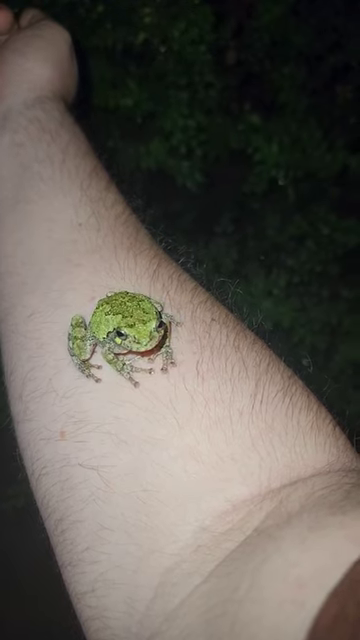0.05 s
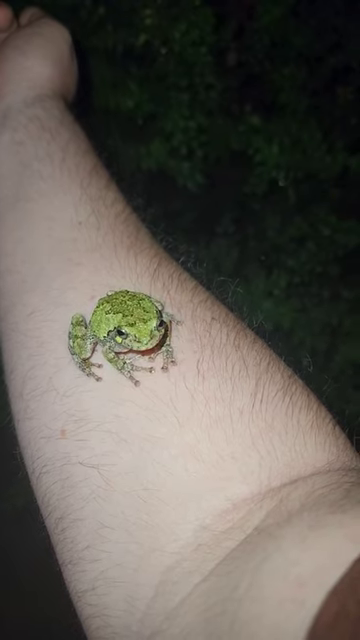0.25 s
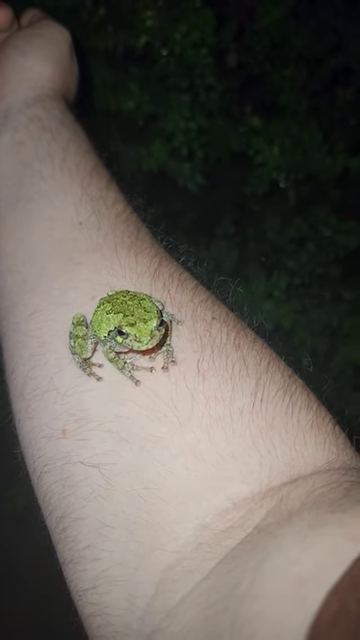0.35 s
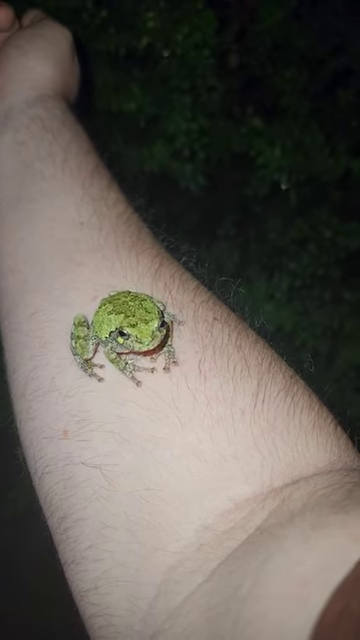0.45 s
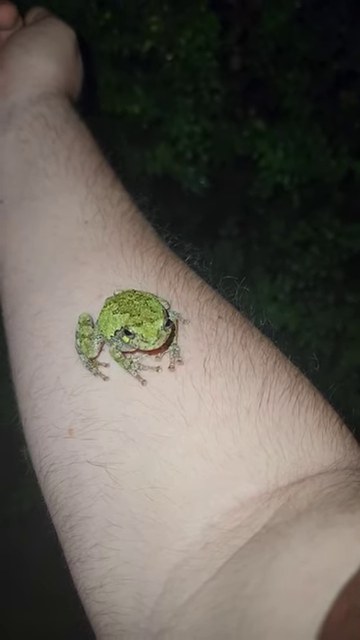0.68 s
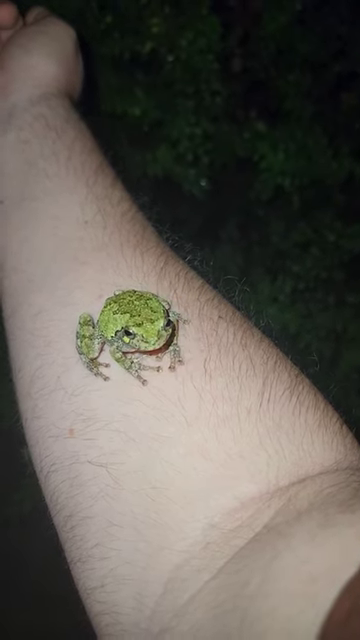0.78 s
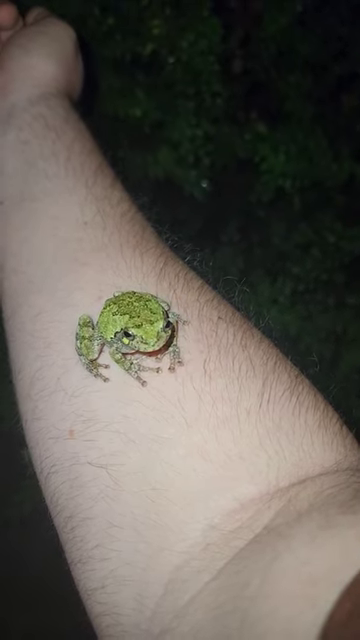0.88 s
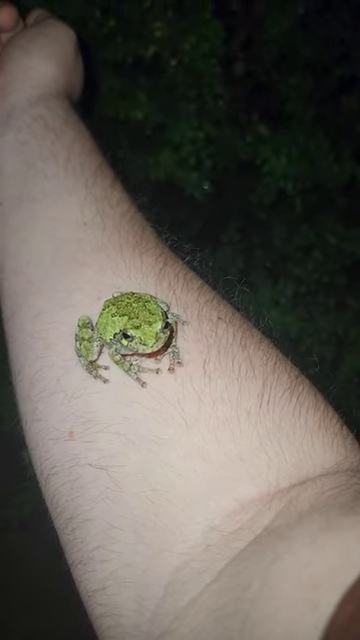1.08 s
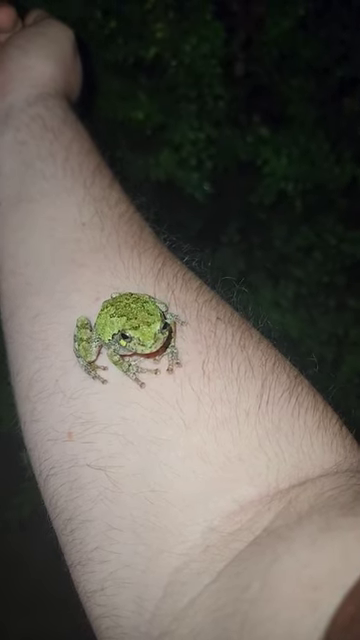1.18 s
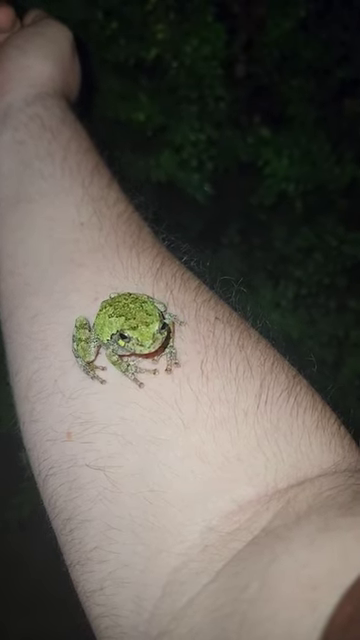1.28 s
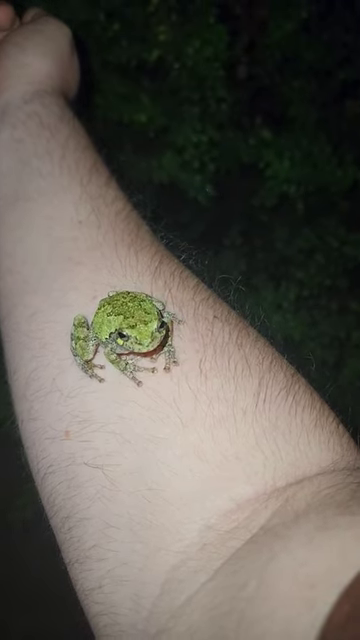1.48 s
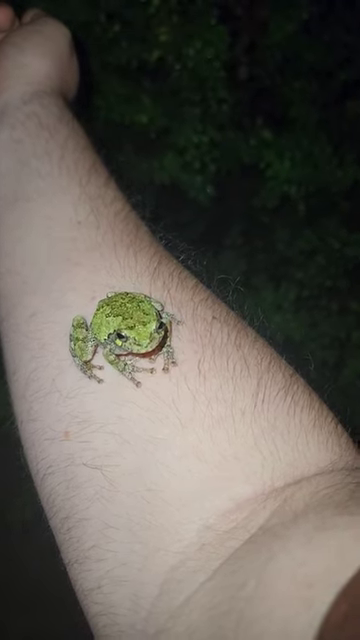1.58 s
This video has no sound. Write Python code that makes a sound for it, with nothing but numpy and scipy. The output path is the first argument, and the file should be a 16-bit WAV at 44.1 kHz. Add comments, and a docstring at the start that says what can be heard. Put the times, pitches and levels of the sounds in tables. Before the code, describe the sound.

A treefrog gives a loud, short trill among trees at night, and a softer, higher one joins and outlasts it. Faint distant frogs and a low rumble lie behind, and a hand softly bumps and rubs the microphone.

```python
"""Among trees at night, two treefrogs trill: a loud low one, then a softer, higher one that outlasts it.
Each pulse is a short upward chirp whose harmonics sweep through body resonances, the second strongest.
Leaves and trunks scatter the calls into a reverberant tail. A far chorus and the low rumble of the
night air lie behind, and a hand softly bumps and rubs a camera body."""
import sys
import numpy as np
from scipy import signal
from scipy.fft import rfft, irfft, next_fast_len
from scipy.io import wavfile
from scipy.ndimage import uniform_filter1d

SR = 44100
rng = np.random.default_rng(int(sys.argv[2]) if len(sys.argv) > 2 else 0)


def log_audio(samples):
    """Write samples as a 16-bit WAV file to the path given in sys.argv[1]."""
    # one column per channel
    frames = np.atleast_2d(samples).T
    # limit to full scale, then quantise
    limited = np.clip(frames, -1, 1)
    pcm = np.round(limited * 32767).astype(np.int16)
    wavfile.write(sys.argv[1], SR, pcm)


N = 72765
T = np.arange(N) / SR
LEAVES_T60_S, TREES_T60_S = 0.089, 0.74


def amp(db):
    """Amplitude ratio of a level in decibels."""
    return 10 ** (np.asarray(db) / 20)


def unit(x):
    """Normalisation to an rms of 1."""
    return x / np.sqrt(np.mean(x ** 2) + 1e-20)


def by_hz(points, hz):
    """Interpolation on a logarithmic frequency axis."""
    f, value = np.transpose(points)
    return np.interp(np.log(hz + 1), np.log(f + 1), value)


def level(points):
    """Gain over time, interpolated in decibels."""
    return amp(np.interp(T, *np.transpose(points)))


def noise(spectrum, patch_db):
    """Partially coherent noise: coloured, with drifting patches, nearly alike at both ears in the bass."""
    # likeness of the ears: f/Hz, coherence/1
    coherence = [(30, 1), (200, 0.97), (500, 0.84), (1000, 0.2), (3000, 0), (12000, 0.034)]
    # left ear over right: f/Hz, level/dB
    balance = [(40, -2.2), (90, -2), (170, 0), (700, -1.5), (2000, -1), (4500, 3), (12000, 6)]
    hz = np.fft.rfftfreq(2048, 1 / SR)
    a, b, c, d, patches = rng.standard_normal((5, N // 512 + 5, len(hz)))
    same = np.clip(by_hz(coherence, hz), -1, 1)
    left = a + 1j * b
    right = same * left + np.sqrt(1 - same ** 2) * (c + 1j * d)
    pan = amp(by_hz(balance, hz) / 2)
    patches = unit(uniform_filter1d(uniform_filter1d(patches, size=6, axis=0), size=14, axis=1))
    frames = np.array([left * pan, right / pan]) * amp(by_hz(spectrum, hz) + patch_db * patches)
    return unit(signal.istft(frames.transpose(0, 2, 1), nperseg=2048, noverlap=1536)[1][:, :N])


def night_air():
    """Broadband ambient noise: a low rumble under a faint hiss."""
    # spectral density: f/Hz, relative level/dB
    spectrum = [(20, -22), (50, 0), (100, -2.5), (170, -8.5), (350, -13.5), (600, -19), (950, -24.5),
                (1500, -27), (2000, -26.5), (2800, -27.5), (3400, -39), (4300, -42), (5100, -36.5),
                (5450, -46), (5800, -36.5), (6500, -50), (7600, -44.5), (8500, -61.5), (10000, -100),
                (13000, -54), (16000, -66)]
    return amp(-45.5) * noise(spectrum, patch_db=1.5)


def chirps(t, times, pitches, gains, rise_s, fall_s, glide_per_s):
    """Linear frequency modulation: envelope, phase and pitch of a train of rising pulses."""
    k = np.searchsorted(times + fall_s, t).clip(0, len(times) - 1)
    from_peak = t - times[k]
    progress = np.where(from_peak < 0, from_peak / rise_s, from_peak / fall_s)
    envelope = gains[k] * np.cos(np.pi / 2 * np.clip(progress, -1, 1))
    phase = 2 * np.pi * pitches[k] * (from_peak + glide_per_s * from_peak ** 2 / 2)
    return envelope, phase, pitches[k] * (1 + glide_per_s * from_peak)


def scatter(x, t60_s, gap_s=0.0033):
    """Multiple scattering by leaves and trunks: a decaying random response, independent at each ear."""
    t = np.arange(SR // 2) / SR
    response = rfft(rng.standard_normal((2, len(t))) * amp(-60 * t / t60_s) * (t > gap_s))
    response /= np.sqrt(uniform_filter1d(abs(response) ** 2, size=60, axis=1))  # unit mean power gain
    return signal.fftconvolve(x, irfft(response)[:, :SR // 3], axes=1)[:, :x.shape[1]]


def far_chorus(count=3, pitch_hz=1254.7, period_s=0.018):
    """Superposition of far frogs, each at its own rate and pitch, blurred by the trees."""
    # loudness of the chorus: t/s, level/dB
    loudness = [(0, -48.5), (.1, -50.5), (.17, -52.5), (.23, -49.5), (.29, -54.5), (.8, -44.5),
                (1.3, -50.5), (1.42, -51.5), (1.52, -50.5), (1.65, -52)]
    # harmonics from the fundamental up: relative level/dB
    harmonics = [-24, 7.5, -31.5, -20.5, -40.5, -23]
    t = np.arange(-SR // 2, N) / SR  # an early start lets the reverberation build
    calls = 0
    for rank, (slower, detune, offset) in enumerate(rng.uniform(-1, 1, (count, 3))):
        times = np.arange(-1, 2, period_s * (1 + 0.046 * slower)) + offset * period_s
        drift, loud = rng.standard_normal((len(times), 2)).T
        pitches = pitch_hz * (1 + 0.016 * detune + 0.0066 * drift)
        gains = amp(2 * loud - 2.7 * rank)
        envelope, phase, _ = chirps(t, times, pitches, gains, rise_s=0.009, fall_s=0.006, glide_per_s=6)
        calls += sum(amp(db) * envelope * np.sin(k * phase) for k, db in enumerate(harmonics, 1))
    blurred = calls + scatter(calls[None], TREES_T60_S)
    return level(loudness) * unit(blurred[:, -N:])


def hand_bumps():
    """Impact excitation: each bump of the hand sets off a heavily damped oscillation."""
    # bumps: t/s, envelope peak level/dB, f/Hz, time constant/s
    bumps = [(0.225, -32.5, 102.6, 0.0025), (1.005, -27.5, 131, 0.0023), (1.076, -38, 333.7, 0.0069),
             (1.186, -27, 77.6, 0.0058), (1.336, -36, 96.5, 0.0022)]
    out = np.zeros(N)
    for start, db, hz, tau in bumps:
        age = np.maximum(T - start, 0)
        out += amp(db) * age / tau * np.exp(1 - age / tau) * np.sin(2 * np.pi * hz * age)
    return out


def trill(voice, pulse, count, start_s, period_s, slowing_s, hz, flat, settle_s, soft_db, swell_s,
          left_lead_s):
    """Source and filter: harmonics sweep through body resonances. Gives direct and foliage-bound sound."""
    n = np.arange(count)
    late, sharp, loud = rng.standard_normal((count, 3)).T
    age = n * period_s + slowing_s * n * (n - 1) / 2  # each period is slowing_s longer than the last
    times = start_s + age + 0.00006 * late
    pitches = hz * (1 - flat * np.exp(-age / settle_s) + 0.008 * sharp)  # starts flat, rises to pitch
    gains = amp(1.3 * loud)
    ears = [chirps(T + lead, times, pitches, gains, **pulse) for lead in (left_lead_s, 0)]
    envelope, phase, pitch = np.stack(ears, axis=1)
    effort_db = soft_db * np.exp(-np.maximum(T - start_s, 0) / swell_s)
    flutter = unit(signal.sosfilt(signal.butter(N=2, Wn=390, fs=SR, output="sos"), rng.standard_normal(N)))
    rasp = 1 + amp(-17.5) * flutter
    direct, to_foliage = np.zeros((2, 2, N))
    for k, (centre, width, *ear_db) in enumerate(voice, 1):
        resonance = 1 / (1 + 2 * ((k * pitch - centre) / width) ** 2) ** 2
        swell = amp(effort_db * (0.34 if k == 1 else 1))  # the fundamental swells least
        partial = envelope * resonance * swell * np.sin(k * phase) * rasp
        direct += amp(ear_db[:2])[:, None] * partial
        to_foliage += amp(ear_db[2:])[:, None] * partial
    return direct, to_foliage


def foliage(x, echo_s, echo_db, tail_db):
    """Reflection and reverberation: an echo (left, right), quick scatter from leaves, a tail from trees."""
    size = next_fast_len(N + 2048)
    delay = np.exp(-2j * np.pi * np.outer(echo_s, np.fft.rfftfreq(size, 1 / SR)))
    echo = irfft(rfft(x, size) * delay, size)[:, :N]
    return amp(echo_db) * echo + scatter(x, LEAVES_T60_S) + amp(tail_db) * scatter(x, TREES_T60_S)


def low_frog():
    """Resonant pulse train: a loud, low trill with a strong early reflection."""
    # body resonance per harmonic: f/Hz, width/Hz, level/dB (direct left, right; scattered left, right)
    voice = [(1430, 780, -29, -23.5, -35.5, -32), (2368, 351, -20, -26, -17.5, -16.5),
             (3650, 580, -45.5, -52, -41.5, -46), (4490, 1800, -56.5, -61.5, -54, -56.5),
             (6400, 2700, -60, -82, -58, -63.5), (7330, 590, -45, -60.5, -46, -56)]
    pulse = dict(rise_s=0.0095, fall_s=0.0042, glide_per_s=28)
    direct, to_foliage = trill(
        voice, pulse, count=25, start_s=0.315, period_s=0.0175, slowing_s=0.000067,
        hz=1309, flat=0.022, settle_s=0.087, soft_db=-13.5, swell_s=0.034, left_lead_s=0.000439)
    return direct + foliage(to_foliage, echo_s=(0.0063, 0.0102), echo_db=-5.5, tail_db=-6.5)


def high_frog():
    """Resonant pulse train: a softer, higher, longer trill with a larger share of reverberation."""
    # body resonance per harmonic: f/Hz, width/Hz, level/dB (direct left, right; scattered left, right)
    voice = [(1626, 647, -37.5, -38, -34.5, -33), (2468, 426, -31, -23, -32, -30),
             (3770, 500, -58, -64.5, -49.5, -55), (5300, 700, -72, -68, -68.5, -61.5),
             (6260, 460, -55.5, -63, -62, -64.5), (7400, 670, -67, -82, -59.5, -101.5),
             (8680, 350, -66.5, -106, -61.5, -80)]
    pulse = dict(rise_s=0.025, fall_s=0.0066, glide_per_s=30.4)
    direct, to_foliage = trill(
        voice, pulse, count=35, start_s=0.5025, period_s=0.01935, slowing_s=0.000031,
        hz=1345, flat=0.042, settle_s=0.08, soft_db=-12.5, swell_s=0.063, left_lead_s=0.00026)
    return direct + foliage(to_foliage, echo_s=(0.0083, 0.0105), echo_db=-14.5, tail_db=-0.5)


def hand_rub():
    """Friction noise: the hand slides briefly over the camera body."""
    # loudness of the rub: t/s, level/dB
    loudness = [(.98, -82), (1.01, -41), (1.06, -48), (1.09, -40.5), (1.15, -43), (1.21, -43.5),
                (1.27, -57), (1.4, -70)]
    # spectral density: f/Hz, relative level/dB
    spectrum = [(20, -3.5), (45, -1), (100, -8.5), (200, -12.5), (340, -12), (480, -12), (800, -28),
                (1500, -26), (5000, -83.5)]
    return level(loudness) * noise(spectrum, patch_db=2.0)


def scene():
    """Linear superposition of all sources at the two ears."""
    return low_frog() + high_frog() + far_chorus() + hand_bumps() + hand_rub() + night_air()


def record(dry):
    """Band limiting by a linear-phase low-pass filter."""
    lowpass = signal.firwin(511, cutoff=15700, window=("kaiser", 9), fs=SR)
    return signal.oaconvolve(dry, lowpass[None], "same")


dry = scene()
out = record(dry)
log_audio(out)
```